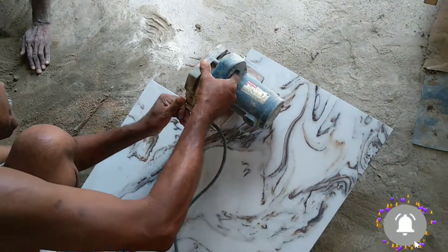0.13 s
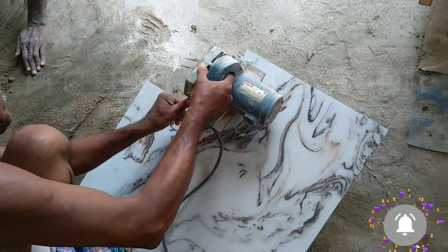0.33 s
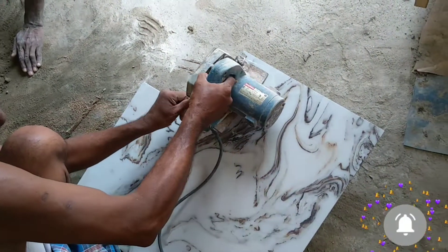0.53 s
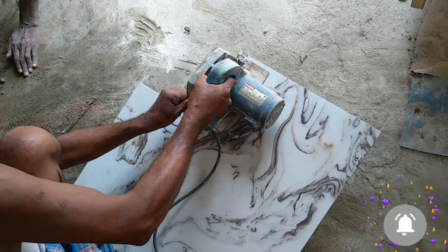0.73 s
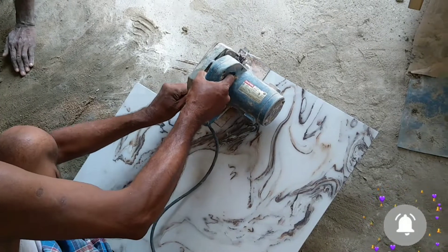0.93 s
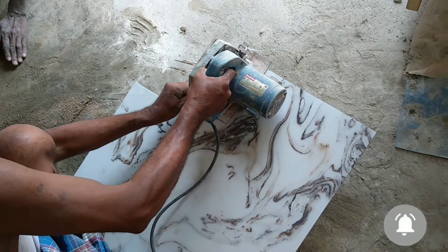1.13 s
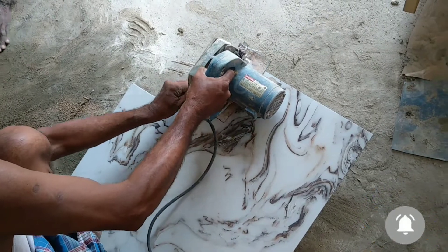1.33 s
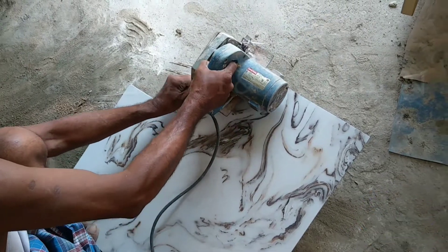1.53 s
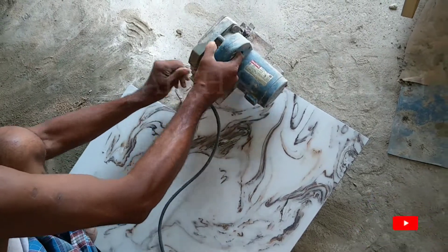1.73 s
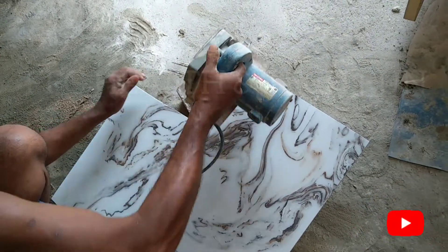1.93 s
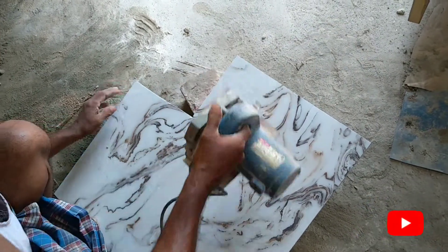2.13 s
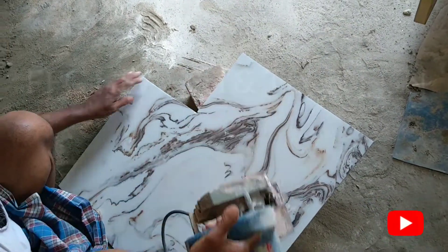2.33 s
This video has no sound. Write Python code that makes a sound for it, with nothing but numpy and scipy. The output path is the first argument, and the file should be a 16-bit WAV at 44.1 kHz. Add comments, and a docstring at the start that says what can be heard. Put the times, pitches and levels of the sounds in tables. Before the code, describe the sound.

Electric tile cutter clicks on, spins freely, grinds loudly with a ringing blade, and winds down outdoors

```python
"""On a concrete floor outdoors, a handheld electric cutter is switched on, runs free, cuts a tile and is lifted away.
Breaking grains of tile hiss and ring the steel blade; the motor is a fan rush plus gear knocks that ring the housing.
Clicks through the switch plastic make its scuff. Lumpy noise and hard puffs are the dust and air that buffet the
two microphone ports, mostly the left one. Behind it all lie a quiet hiss and the hum of a distant machine."""
import sys
import numpy as np
from scipy import signal
from scipy.fft import rfft, irfft
from scipy.io import wavfile
from scipy.ndimage import uniform_filter1d

SR = 44100
rng = np.random.default_rng(int(sys.argv[2]) if len(sys.argv) > 2 else 0)


def materialize(psi):
    """Save the field psi as 16-bit PCM at rate SR to the path in sys.argv[1].

    A 1-D psi becomes a single channel; in a 2-D psi each row is a channel.
    """
    bounded = np.clip(np.atleast_2d(psi).T, -1, 1)
    quanta = np.round(bounded * 32767).astype(np.int16)
    wavfile.write(sys.argv[1], SR, quanta)


def undo_db(level):
    """Turn decibels back into plain size, where 20 dB means ten times bigger."""
    steps = np.asarray(level, float) / 20
    return 10 ** steps


N = 105840  # length in samples
T = np.arange(N) / SR  # time of every sample [s]


def evened(x):
    """Scales a sound to an rms of 1."""
    return x / np.sqrt(np.mean(x ** 2) + 1e-20)


def read(points, hz):
    """Reads a table on a log-frequency axis, since we hear pitch in ratios."""
    f, value = np.transpose(points)
    return np.interp(np.log(hz + 1), np.log(f + 1), value)


def column(table, order):
    """Draws straight lines through one column of a table over time."""
    rows = np.array(table)
    return np.interp(T, rows[:, 0], rows[:, order])


def between_ends(table):
    """Is true only between the first and last times of a table."""
    return (T > table[0][0]) * (T < table[-1][0])


def coloured(x, points):
    """Shapes a sound to a spectrum with a minimum-phase filter; rms 1."""
    hz = abs(np.fft.fftfreq(4096, 1 / SR))
    log_gain = np.log(undo_db(np.maximum(read(points, hz), -100)))
    response = np.exp(np.conj(signal.hilbert(log_gain)))
    taps = np.fft.ifft(response).real[:2048]
    return evened(signal.oaconvolve(x, taps)[:N])


def resonate(x, hz, width):
    """Rings at one frequency, fixed or moving, with a gain of 1 at its centre."""
    turn = np.exp(2j * np.pi * np.cumsum(hz * np.ones(N)) / SR)
    r = np.exp(-np.pi * max(width, 3) / SR)
    # shift the resonance down to 0 Hz, smooth there, shift back
    return 2 * (turn * signal.lfilter([1 - r], [1, -r], x / turn)).real


def resonate_twice(x, hz, width, widening):
    """Passes a sound through a resonance and a wider one, for steeper skirts; rms 1."""
    return evened(resonate(resonate(x, hz, width), hz, widening * width))


def steadied(x):
    """Evens out part of the level swings of a ringing mode; rms 1."""
    power = abs(uniform_filter1d(x ** 2, int(.012 * SR))) + .01 * np.mean(x ** 2)
    return evened(x / power ** (.25 / 2))  # takes out a quarter of each swing in dB


def grains(per_s, spread_db):
    """Makes random clicks of either sign, a few of them large; rms 1."""
    size = undo_db(spread_db * np.minimum(rng.exponential(1, N), 4)) * rng.choice([-1., 1.], N)
    return evened(size * (rng.random(N) < per_s / SR))


def swell(spread_db, length_s):
    """Slow random gain, from noise smoothed over a given length."""
    return undo_db(spread_db * evened(uniform_filter1d(rng.standard_normal(N), int(length_s * SR) + 1)))


# How far the left port lags the direct sound at the right: (frequency [Hz], lag [rad])
LEFT_LAG = [(4000, 0.35), (6500, 7.9), (16000, 5)]


def ports(x, balance, same):
    """Left hears the source; right hears it partly direct, partly scattered by floor and walls."""
    hz, t = np.fft.rfftfreq(N, 1 / SR), np.arange(6000) / SR
    taps = rng.standard_normal(len(t)) * np.exp(-t / .03)  # scattered sound dies away over 0.03 s
    scattered = rfft(signal.oaconvolve(x, taps / np.linalg.norm(taps))[:N])
    direct = rfft(x)
    likeness = np.clip(read(same, hz), 0, 1)
    right = likeness * direct * np.exp(1j * read(LEFT_LAG, hz)) + np.sqrt(1 - likeness ** 2) * scattered
    lean_db = read(balance, hz)
    left_gain, right_gain = undo_db(lean_db / 2), undo_db(-lean_db / 2)
    norm = 2 / (left_gain + right_gain)
    return irfft(np.array([direct * left_gain, right * right_gain]) * norm, N)


# Blade in the tile: (time [s], ring level [dB], grit level [dB])
CUT_LEVELS = [(.6, -21, -30), (.622, -30, 2), (.632, 0.5, -4), (.67, 2, -57), (.7, -5.5, -11),
              (.71, 6, 4.5), (.735, -4.5, -14), (.75, 9.5, -11.5), (.9, 8.5, -2.5), (1.1, 6.5, 5.5),
              (1.6, 10, 0.5), (1.68, 3.5, -27), (1.76, -9, -15), (1.8, -5, -21), (1.85, -13, -54),
              (1.88, -55, -47)]
# Ringing modes of the gripped blade, levels relative and before wider modes are weighted up:
# (frequency [Hz], width [Hz], level [dB], extra entering the tile [dB], extra leaving it [dB])
BLADE_MODES = [(1282, 68, -20.5, 16, -14), (3757, 110, 0, 0.5, -11), (4286, 64, -3, -11, 0.5),
               (4902, 61, 3.5, 0, -1.5), (5700, 28, -17.5, 25.5, 12), (6305, 29.7, 1.5, 10.5, 6),
               (6920, 13, -20.5, -4, 8), (5400, 97, -10.5, -8, 10), (5900, 280, -25.5, -14, 18.5)]
# Colour of the gritty hiss: (frequency [Hz], relative level [dB per Hz])
GRIT_COLOUR = [(180, -44), (300, -10.5), (2690, -6.5), (4880, -0.5), (5850, -10.5), (6460, -5.5),
               (7620, -32.5), (10300, -13.5), (14500, -20), (16200, -27.5)]
# How the cut leans to the left port: (frequency [Hz], left minus right [dB])
CUT_LEAN = [(500, 10.5), (1500, 4), (2500, 4.5), (4400, 6.5), (6500, 10), (8000, -6), (15000, 1.5)]
# How alike the cut is at both ports: (frequency [Hz], likeness [0-1])
CUT_LIKENESS = [(4500, 0.18), (8000, 0.66)]
ENTER_S, SETTLE_S, LEAVE_S, LIFT_S = 0.738, 0.022, 1.61, 0.14  # middle and softness of each change [s]
SLACK, GRIPPED_S = .02, 1.15  # share by which the modes start low; time when they are up to pitch [s]


def cut():
    """Grains of tile break on the rim: a gritty hiss, and modes that rise a little as the slot grips the blade."""
    drive = grains(per_s=4900, spread_db=2)
    pitch = 1 - SLACK * np.clip((GRIPPED_S - T) / (GRIPPED_S - CUT_LEVELS[0][0]), 0, 1)
    enter = (1 - np.tanh((T - ENTER_S) / SETTLE_S)) / 2
    leave = (1 + np.tanh((T - LEAVE_S) / LIFT_S)) / 2
    ring = 0
    for hz, width, db, enter_db, leave_db in BLADE_MODES:
        # each mode swells on its own
        gain = undo_db(db + enter * enter_db + leave * leave_db) * swell(spread_db=2, length_s=.05)
        ring = ring + gain * np.sqrt(width) * steadied(resonate(drive, hz * pitch, width))
    ring = evened(ring) * undo_db(column(CUT_LEVELS, order=1))
    grit = coloured(drive, GRIT_COLOUR) * undo_db(column(CUT_LEVELS, order=2))
    return ports((ring + grit) * between_ends(CUT_LEVELS), CUT_LEAN, CUT_LIKENESS)


# Free-running motor: (time [s], fan rush level [dB], housing ring level [dB], turned away [0-1])
MOTOR_LEVELS = [(.244, -26, -46, 0.4), (.249, -0.5, 0, 0.57), (.27, -1, -5.5, 0.35), (.45, -4, -8.5, 0.66),
                (.57, -6.5, -6, 0.43), (.63, -5.5, -6, 0.83), (1.2, -9, -17.5, 0),
                (1.78, -3.5, -10.5, 0.96), (1.81, -16, -26, 1), (1.9, -16, -29, 0.99),
                (2.03, -19.5, -25.5, 0.95), (2.4, -25, -29.5, 0.87)]
# Colour of the rush with the tool facing the ports: (frequency [Hz], relative level [dB per Hz])
RUSH_FACING = [(100, -63), (678, -5.5), (1700, -10), (3910, -1), (4420, -7.5), (6000, -19), (14500, -40)]
# Colour of the rush with the tool turned away: (frequency [Hz], relative level [dB per Hz])
RUSH_AWAY = [(170, -38), (330, -34), (703, -14.5), (1250, -13), (1700, -18.5), (2300, -13), (3830, -6.5),
             (6030, -9.5), (7430, -29.5), (14500, -29.5)]
# Housing modes rung by the gears, re housing ring:
# (frequency [Hz], width of the first of two resonances [Hz], level facing [dB], level turned away [dB])
HOUSING_MODES = [(667, 48, 2, -29), (312.3, 30, -25.5, -31.5), (2374, 110, -46, -4), (4800, 8.3, 1, -36)]
# Gear whine in the housing, shifting as the tool is handled:
# (time [s], frequency [Hz], level re housing ring [dB])
GEAR_WHINE = [(.3, 3950, -2.5), (.55, 3930, 8.5), (.62, 4050, -0.5), (1.88, 3840, 3.5), (1.97, 3790, 2),
              (2.03, 3830, 7), (2.09, 3975, 0.5), (2.16, 4070, 2), (2.22, 3780, 1), (2.4, 3780, -6)]
# The housing modes ring up briefly while the tool swings away:
# (time of the peak [s], time from the peak to 1/e of the rise [s], rise fully turned away [dB])
HOUSING_SWELLS = [(1.945, 0.034, 9.5), (2.29, 0.027, 8)]
# How the motor and switch lean to the left port: (frequency [Hz], left minus right [dB])
MOTOR_LEAN = [(180, -3), (550, 0.5), (1650, 1.5), (4970, 13), (15000, -7)]
# How alike they are at both ports: (frequency [Hz], likeness [0-1])
MOTOR_LIKENESS = [(800, 0.72), (4000, 0.3), (12000, 0.89)]
KNOCKS_PER_S, KNOCK_JITTER = 90, .3  # average rate, roughly; unevenness as a share of the gap
KNOCK_SPREAD_DB, KNOCK_PEAK_S = 4, .0015  # spread of strength; time each knock takes to peak
RING_SHARE, RUSH_SHARE = .6, .23  # share of the noise behind ring and rush that follows the knocks


def motor():
    """Fan rush plus uneven gear knocks that ring the housing."""
    away = np.clip(column(MOTOR_LEVELS, order=3), 0, 1)
    gaps = (1 + KNOCK_JITTER * np.clip(rng.standard_normal(400), -2, 3)) / KNOCKS_PER_S
    at = (np.cumsum(gaps) * SR).astype(int)
    strength = undo_db(KNOCK_SPREAD_DB * rng.standard_normal(400))
    knocks = np.zeros(N)
    knocks[at[at < N]] = strength[at < N]
    t = np.arange(800) / SR
    beat = evened(np.convolve(knocks, t * np.exp(-t / KNOCK_PEAK_S))[:N])
    ring_drive = evened((1 - RING_SHARE + RING_SHARE * beat) * rng.standard_normal(N))
    rush_drive = evened((1 - RUSH_SHARE + RUSH_SHARE * beat) * rng.standard_normal(N))

    lift_db = sum(db * np.exp(-((T - s) / length) ** 2) for s, length, db in HOUSING_SWELLS)
    whine_hz = column(GEAR_WHINE, order=1)
    ring = undo_db(column(GEAR_WHINE, order=2)) * resonate_twice(ring_drive, whine_hz, width=178, widening=2)
    for hz, width, db, away_db in HOUSING_MODES:
        gain = undo_db(db + away * (away_db + lift_db - db)) * swell(spread_db=2, length_s=.08)
        ring += gain * resonate_twice(ring_drive, hz, width, widening=2)

    facing_rush = np.sqrt(1 - away) * coloured(rush_drive, RUSH_FACING)
    away_rush = np.sqrt(away) * coloured(rush_drive[::-1], RUSH_AWAY)  # backwards, so the two do not match
    rush = (facing_rush + away_rush) * undo_db(column(MOTOR_LEVELS, order=1))
    x = rush + ring * undo_db(column(MOTOR_LEVELS, order=2))
    return ports(x * (T > MOTOR_LEVELS[0][0]), MOTOR_LEAN, MOTOR_LIKENESS)


# Scuff of the switch slide: (time [s], level [dB])
SLIDE_LEVELS = [(.187, -50), (.192, -25.5), (.215, -16.5), (.235, -19.5), (.25, -14), (.26, -73)]
# Ringing modes of the scuff, before wider modes are weighted up:
# (frequency [Hz], width of the first of two resonances [Hz], relative level [dB])
SLIDE_MODES = [(1086, 48, -1.5), (1506, 150, 5), (2270, 70, -3), (5300, 580, -2.5)]
# Colour of the scuff's hiss: (frequency [Hz], relative level [dB per Hz])
SLIDE_COLOUR = [(120, -30), (700, -13.5), (3000, -15), (4000, -6.5), (8000, -42)]


def switch():
    """The thumb drags the slide switch across the plastic: dense clicks that hiss and ring."""
    drive = grains(per_s=10000, spread_db=1.7)
    ring = evened(sum(undo_db(db) * np.sqrt(width) * resonate_twice(drive, hz, width, widening=4)
                      for hz, width, db in SLIDE_MODES))
    scuff = evened(ring + coloured(drive, SLIDE_COLOUR)) * undo_db(column(SLIDE_LEVELS, order=1))
    return ports(scuff * between_ends(SLIDE_LEVELS), MOTOR_LEAN, MOTOR_LIKENESS)


# Air on the ports: (time [s], left level [dB], right level [dB])
GUST_LEVELS = [(.6, -66, -65), (.63, -12, -45), (.67, -59, -48), (.71, -12, -52), (.9, 2, -24),
               (1.2, 4, -5.5), (1.3, 4.5, -2), (1.6, 1.5, -20), (1.66, -15, -39), (1.75, -67, -50)]
# Colour of the air: (frequency [Hz], relative level [dB per Hz])
AIR_COLOUR = [(20, -46), (50, -9), (120, -4.5), (300, -8.5), (700, -11), (1500, -14), (3000, -18),
              (7000, -43)]
# Single hard puffs: (time [s], port [0 left, 1 right], relative level [dB], time scale [s])
HARD_PUFFS = [(0.629, 0, -6.5, 0.0038), (0.782, 0, 7, 0.0029), (0.812, 0, 10, 0.00039),
              (0.841, 0, 11.5, 0.0031), (0.891, 0, 8.5, 0.0029), (0.711, 0, 1, 0.0049)]


def air():
    """Lumpy pressure on each port separately, with a few hard puffs: a push and a slower swing back."""
    out = np.array([coloured(grains(per_s=500, spread_db=3), AIR_COLOUR) * undo_db(column(GUST_LEVELS, order=k))
                    for k in (1, 2)])
    out *= between_ends(GUST_LEVELS)
    for s, port, db, length in HARD_PUFFS:
        u = np.maximum(T - s, 0) / length
        push = np.sin(2.9 * u) * np.exp(-1.2 * u) * np.minimum(u, .4)  # the last factor softens the start
        out[int(port > .5)] += undo_db(db) * 4.4 * push
    return out


# Colour of the outdoor hiss: (frequency [Hz], relative level [dB per Hz])
YARD_COLOUR = [(100, -10), (300, -11.5), (700, -13), (2000, -13.5), (5900, -7.5), (8000, -22), (15000, -27)]
# How the hiss leans to the left port: (frequency [Hz], left minus right [dB])
YARD_LEAN = [(500, 0), (4000, 8.5), (12000, 0)]
# A distant machine: (frequency [Hz], level [dB])
DISTANT_HUM = [(84, -58), (711, -60.5)]


def yard():
    """Quiet outdoor hiss from shaped noise, and a distant hum of slowly swelling sines."""
    likeness = [(100, 0.65), (3000, 0.32)]  # (frequency [Hz], likeness [0-1])
    hiss = ports(undo_db(-46) * coloured(rng.standard_normal(N), YARD_COLOUR), YARD_LEAN, likeness)
    hum = sum(undo_db(db) * swell(spread_db=2, length_s=.08) * evened(np.sin(2 * np.pi * hz * T))
              for hz, db in DISTANT_HUM)
    return hiss + hum


def scene():
    """Adds all sources at the two ports."""
    return cut() + motor() + switch() + air() + yard()


def low_pass(x):
    """Removes everything above the highest recorded frequency."""
    return signal.sosfilt(signal.butter(12, 16100, fs=SR, output="sos"), x)


KNEE_DB, SQUEEZE = -36, .45  # power where gain control sets in; dB taken off per dB above it
RECOVER_DB_PER_S, LOW_CUT_HZ = 60, 45  # recovery of the sensed power, before SQUEEZE; edge of the low cut


def record(dry):
    """Low cut, gain control that falls at once and recovers slowly, then soft overload."""
    x = signal.sosfilt(signal.butter(2, LOW_CUT_HZ, "high", fs=SR, output="sos"), dry)
    power_db = 10 * np.log10(abs(uniform_filter1d((x ** 2).mean(0), 1300)) + 1e-12)
    fall = T * RECOVER_DB_PER_S
    held_db = np.maximum.accumulate(power_db + fall) - fall  # jumps up with the power, sinks steadily
    over_db = np.maximum(held_db - KNEE_DB, 0)
    x = x / undo_db(SQUEEZE * uniform_filter1d(over_db, 400))
    return low_pass(np.tanh(x))


dry = scene()
out = record(dry)
materialize(out)
```